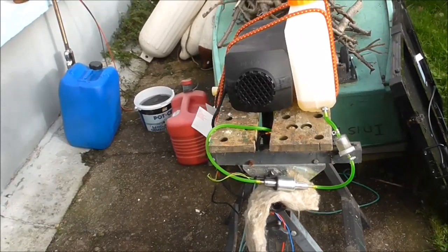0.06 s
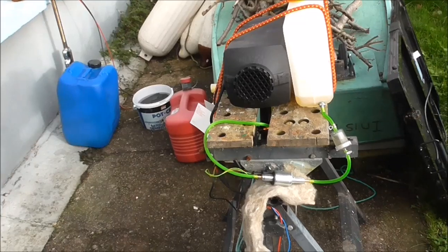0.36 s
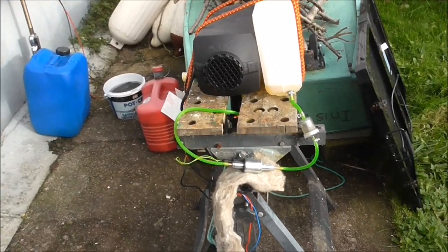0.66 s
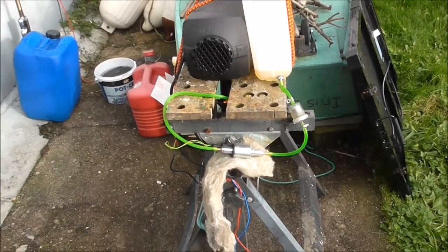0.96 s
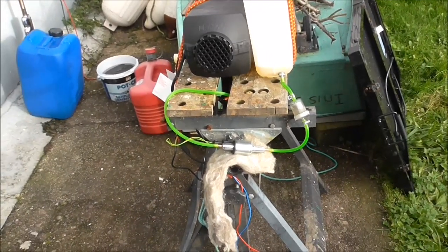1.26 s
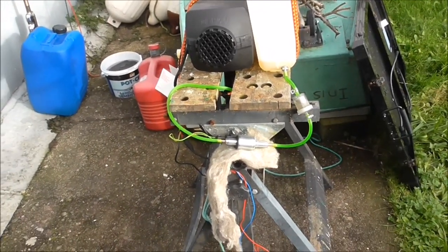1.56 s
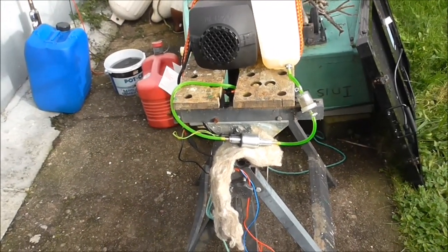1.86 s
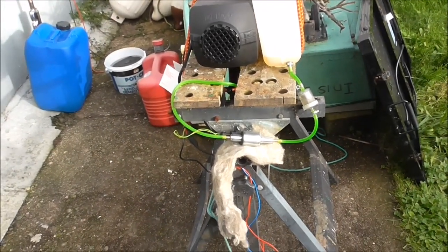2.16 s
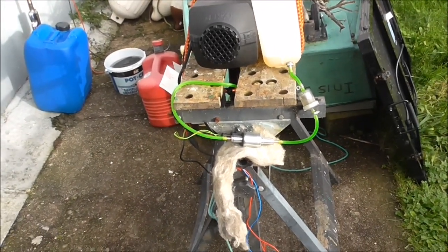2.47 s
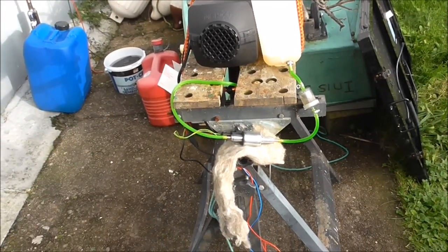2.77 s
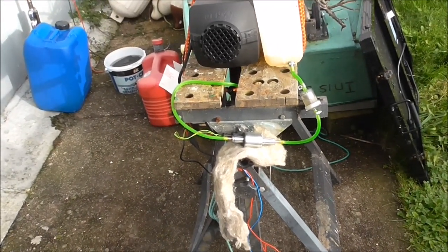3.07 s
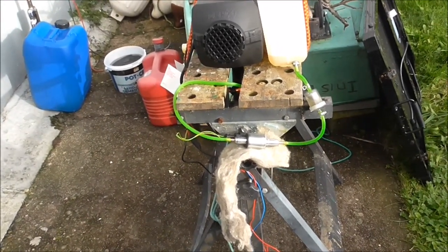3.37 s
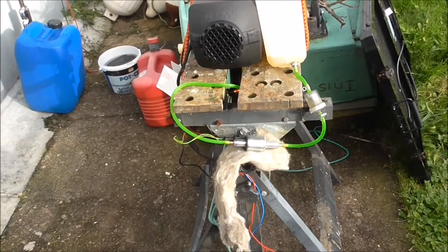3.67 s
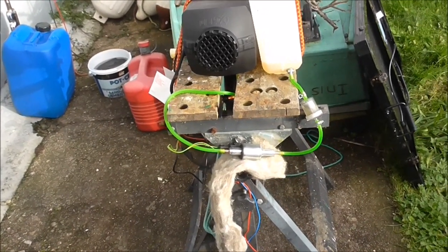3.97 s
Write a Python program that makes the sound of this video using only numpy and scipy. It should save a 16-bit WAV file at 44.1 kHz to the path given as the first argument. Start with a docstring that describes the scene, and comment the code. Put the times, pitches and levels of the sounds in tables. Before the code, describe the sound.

A diesel air heater runs close by outdoors for all four seconds, its low, slightly fluttering burner drone mixed with rushing fan air, a whirr and a thin whine. The fuel pump gives faint, sharp metallic ticks four times a second. Wind puffs rumble on the microphone from about 1.7 to 2.2 seconds. The whirr briefly rings louder around 1 second and several times from 3 seconds on.

```python
"""A diesel air heater runs steadily on a concrete yard, heard from a hand-held microphone a step away.
Its flame drones in the burner and exhaust pipe, and the low drone has brief louder swells.
The fan's swirling air makes the casing whirr over a steady rush, and the fuel pump's plunger
ticks four times a second. A few puffs of wind buffet the microphone."""
import sys
import numpy as np
from scipy import signal
from scipy.fft import rfft, irfft
from scipy.io import wavfile

SR = 44100
rng = np.random.default_rng(int(sys.argv[2]) if len(sys.argv) > 2 else 0)


def digitize_waveform(pressure):
    """Quantize a signal to 16-bit integers and store it at the path in sys.argv[1].

    Rows of a 2-D input are taken as channels; values are limited to [-1, 1].
    """
    field = np.atleast_2d(pressure).T
    bounded = np.clip(field, -1, 1)
    quanta = np.round(bounded * 32767).astype(np.int16)
    wavfile.write(sys.argv[1], SR, quanta)


N = 176400
TIME = np.arange(N) / SR
FREQS_HZ = np.maximum(np.arange(N // 2 + 1) * SR / N, 1)


def burner():
    """The flame makes the exhaust pipe and the burner ring with a low drone."""
    # the drone slowly rises and sags a little: t/s, level/dB
    slow_changes = [(0, -0.5), (.6, -.7), (1.07, 0), (1.3, -1.5), (1.5, 1), (1.72, -2), (1.9, 1),
                    (2.2, 0.9), (2.4, -1.5), (2.7, 0.5), (2.97, -1.4), (3.28, -1), (3.6, -0.5), (4, .5)]
    # the exhaust pipe's main resonances (pitches it likes to ring at): f/Hz, width/Hz, level/dB
    pipe_resonances = [(251.4, 43.4, -24), (297, 39.5, -29)]
    # the burner's weaker resonances: f/Hz, width/Hz, level/dB
    burner_resonances = [(66.4, 24, -53.5), (140.8, 22.5, -35), (164, 28, -41), (351, 26, -43),
                         (393, 23, -39.5), (471, 16, -50.5)]
    # brief louder swells of the low drone: t/s, length/s, f/Hz, peak/dB
    brief_swells = [(0.174, .014, 272, -12), (.351, 0.017, 260, -16), (0.482, 0.016, 292, -16),
                    (.931, 0.019, 289, -16.5), (1.014, .025, 238, -15.5), (1.072, 0.015, 254, -13),
                    (1.106, 0.036, 246, -16), (1.19, 0.015, 258, -13), (1.405, 0.014, 283, -10),
                    (1.554, 0.01, 277, -12), (1.639, 0.016, 251, -13.5), (1.9, 0.019, 270, -12),
                    (2.046, 0.02, 284, -14.5), (2.187, 0.03, 263, -13.5), (2.335, 0.011, 258, -13.5),
                    (2.685, 0.039, 242, -14), (3.138, .018, 265, -15.5), (3.19, 0.017, 255, -13.5),
                    (3.246, 0.013, 287, -14), (3.292, 0.014, 262, -13), (3.353, 0.0088, 280, -12.5),
                    (3.38, 0.0096, 268, -12), (3.549, 0.018, 247, -13.6), (3.786, .015, 288, -11),
                    (3.975, 0.012, 257, -9.5)]
    strength = from_db(in_time(slow_changes)[0])
    drone = soft_limit(strength * resonating(pipe_resonances, steepness=2.15), ceiling_db=-14)
    pipe = surging(drone, brief_swells, wobble_rad=0.078)
    return pipe + strength * resonating(burner_resonances, steepness=3.3)


def fan():
    """The fan's wavering air rushes and rings in the casing, with a whirr, whine and whistle on top."""
    # broad rush of air: f/Hz, level/dB per Hz
    rush_colour = [(20, -84), (45, -82), (85, -77), (130, -56.5), (200, -67.5), (330, -59.5), (440, -69),
                   (520, -64), (720, -62.5), (850, -65.5), (1150, -67), (1420, -64.5), (1550, -69.5),
                   (1950, -74.5), (2400, -83), (2600, -82.5), (2900, -87), (3150, -82.5), (3600, -78.5),
                   (3850, -86), (4100, -81), (5000, -82.5), (6550, -82.5), (6950, -88.5), (7700, -90.5),
                   (8900, -87.5), (11400, -93), (11900, -95.5), (12700, -96.5), (13500, -99), (15000, -101)]
    # resonances of the casing and outlet: f/Hz, width/Hz, level/dB
    casing_resonances = [(555, 100, -42), (612, 75, -38.5), (922, 16, -48), (1018, 58, -41.5),
                         (1183, 21, -47), (1688, 33, -51), (1800, 20, -53.5), (2133, 91, -45.5),
                         (2436, 47, -50.5), (3260, 64, -54), (3401, 49, -52), (5400, 90, -77),
                         (10864, 65, -67)]
    # the fan's main whirr: f/Hz, width/Hz, level/dB
    whirr_resonances = [(1283, 21, -39), (1334, 35, -35), (1377, 33, -35.5)]
    # the whine and a hollow ring above it: f/Hz, width/Hz, level/dB
    whine_resonances = [(2308, 24.5, -44), (3390, 52, -53.5)]
    # thin whistle of air at the intake: f/Hz, width/Hz, level/dB
    whistle_resonances = [(6510, 110, -61.5), (6760, 110, -68)]
    # level changes as the microphone moves: t/s, whirr/dB, whine/dB, whistle/dB
    level_changes = [(0, 0.5, 1.5, 10.5), (.35, -1.5, 2.5, 2), (.75, -0.5, 3.5, 1), (1.35, -3, -0.5, -8),
                     (1.68, -0.5, 1.5, -11), (1.82, 0.5, -4, 4), (2.1, 0, -3, 6), (2.5, .5, -1.5, 4.5),
                     (3.05, 0.8, -2, -5), (3.6, 1.8, -3.5, -5), (4, 1, -2, 1)]
    # moments when the whirr sings out: t/s, length/s, f/Hz, peak/dB
    surges = [(0.787, 0.034, 1355, -26.5), (0.895, 0.05, 1355, -24), (1.151, 0.034, 1349, -26),
              (2.444, 0.033, 1302, -24), (2.976, .02, 1340, -21), (3.246, .03, 1340, -22),
              (3.462, 0.026, 1335, -19.5), (3.72, 0.025, 1328, -18), (3.863, 0.028, 1323, -21)]
    rush_flutter_db, whirr_flutter_db = 0.5, 0.9
    pulse_hz, pulse_depth_db = 7.8125, 1.14
    whirr_db, whine_db, whistle_db = in_time(level_changes)
    airflow = waver(hz=12)
    rush = from_db(rush_flutter_db * airflow) * heater_noise(from_db(at_hz(rush_colour)) ** 2)
    casing = resonating(casing_resonances, steepness=1.86)
    pulse_db = pulse_depth_db * np.cos(2 * np.pi * pulse_hz * TIME)
    whirr_gain = from_db(whirr_db + pulse_db + whirr_flutter_db * airflow)
    whirr = surging(whirr_gain * resonating(whirr_resonances, steepness=1.78), surges, wobble_rad=0.49)
    whine = from_db(whine_db) * resonating(whine_resonances, steepness=1.01)
    whistle = from_db(whistle_db) * resonating(whistle_resonances, steepness=1.2)
    return rush + casing + whirr + whine + whistle


def pump():
    """At each stroke the plunger hits its stop, the small metal body rings and its bracket buzzes."""
    # strokes of the fuel pump: t/s, level/dB
    strokes = [(.0450, -28), (0.289, -27), (0.5336, -30), (.7782, -32), (1.0223, -28), (1.2671, -29),
               (1.5118, -29), (1.7558, -32), (2.0002, -30), (2.2447, -32), (2.4891, -30), (2.733, -29.5),
               (2.9784, -30), (3.2223, -33), (3.4667, -31), (3.7111, -29.5), (3.955, -27.5)]
    # the plunger's hits within one stroke: delay/s, level/dB
    hits = [(-.0004, -2.5), (.0001, 0), (.0007, -16)]
    # ringing tones of the pump's body: f/Hz, level/dB, fade time/s
    body_tones = [(5320, -5.5, .006), (5970, -10.5, .006), (7730, -10, 0.0047), (8600, -11.5, 0.0032),
                  (8960, -12, .005), (12500, -12, .002), (14300, -16, .002)]
    # buzz of the bracket: f/Hz, level/dB per Hz
    bracket_colour = [(3000, -105), (4800, -89), (5500, -82.5), (6800, -86), (7700, -83), (9200, -84),
                      (10500, -102), (15000, -110)]
    starts, stroke_db = np.transpose(strokes)
    # no two strokes sound quite alike
    hit_spread_db, tone_spread_db = 1, 2
    hit_chances = hit_spread_db * rng.standard_normal((len(starts), len(hits)))
    tone_chances = tone_spread_db * rng.standard_normal((len(starts), len(body_tones)))
    body = 0
    for (hz, tone_db, fade_s), tone_chance_db in zip(body_tones, tone_chances.T):
        clicks = np.zeros(N)
        for (delay, hit_db), hit_chance_db in zip(hits, hit_chances.T):
            samples = np.clip((starts + delay) * SR, 0, N - 1).astype(int)
            clicks[samples] += from_db(stroke_db + hit_db + hit_chance_db + tone_chance_db)
        body = body + from_db(tone_db) * ring(clicks, hz, fade_s)
    buzz_gain = np.zeros(N)
    for start, db in strokes:
        faded_db = 60 * np.clip((TIME - start) / .05, 0, 2)  # 60 dB quieter after 0.05 s
        buzz_gain += (TIME >= start) * from_db(db - stroke_db.mean() - faded_db)
    return body + buzz_gain * heater_noise(from_db(at_hz(bracket_colour)) ** 2)


def wind():
    """Breeze and puffs rumble on the microphone, pushing left and right mostly against each other."""
    # light breeze between the puffs: t/s, level/dB
    breeze = [(0, -52), (.5, -60), (1.3, -62), (1.65, -44), (2.3, -42), (2.75, -59), (3.0, -46), (3.3, -52),
              (4, -57)]
    # puffs of wind: t/s, length/s, level/dB, rustle compared with the puff/dB
    puffs = [(.17, 0.046, -36, -20), (1.727, 0.15, -33, -20), (1.88, 0.044, -23, -18), (2.1, .06, -23, -18),
             (2.182, 0.054, -21, -14), (3.045, 0.053, -44, -20), (3.435, 0.057, -33, -20)]
    # the wind's deep rumble: f/Hz, relative level/dB
    rumble_colour = [(20, -28), (50, 1.5), (90, 0.5), (135, 5.5), (200, -15), (300, -24), (600, -42),
                     (1500, -60), (5000, -90)]
    # the brighter rustle in a puff: f/Hz, relative level/dB
    rustle_colour = [(40, -14), (150, -4), (300, 4), (450, -11), (800, -26), (1500, -34), (5000, -60)]
    puff_edge_s = 0.024
    rumble_gain, rustle_gain = from_db(in_time(breeze)[0]), np.zeros(N)
    for start, length, db, rustle_db in puffs:
        inside_s = np.minimum(TIME - start, start + length - TIME)
        puff = from_db(db) * np.clip(.5 + inside_s / puff_edge_s, 0, 1)
        rumble_gain += puff
        rustle_gain += from_db(rustle_db) * puff
    rumble = air_noise(from_db(at_hz(rumble_colour)) ** 2, likeness=-0.87)
    rustle = air_noise(from_db(at_hz(rustle_colour)) ** 2, likeness=-0.87)
    return rumble_gain * rumble / rumble.std() + rustle_gain * rustle / rustle.std()


def colour_ripple(sound, delay_s=.0095, copy_db=-20):
    """Add a faint delayed copy, which slightly ripples the treble's colour."""
    delayed = np.array([np.interp(TIME - delay_s, TIME, channel, left=0) for channel in sound])
    return sound + from_db(copy_db) * delayed


def resonating(resonances, steepness):
    """Swirling air rings at a set of pitches; more steepness leaves less sound far from each pitch."""
    power = 0
    for hz, width, db in resonances:
        off_pitch = (FREQS_HZ / hz - hz / FREQS_HZ) * hz / width
        peak = (1 + off_pitch ** 2 / steepness) ** -steepness
        power = power + from_db(db) ** 2 * peak / (peak.sum() * SR / N)
    return heater_noise(power)


def surging(sound, surges, wobble_rad):
    """At each surge the noisy sound briefly gives way to one swelling, slightly unsteady note."""
    wobble = wobble_rad * waver(hz=45)
    for (middle, length, hz, db), phase in zip(surges, rng.random(len(surges))):
        swell = .5 ** np.minimum((2 * (TIME - middle) / length) ** 2, 20)
        note = np.sin(2 * np.pi * (hz * (TIME - middle) + phase) + wobble)
        sound = sound * np.sqrt(1 - swell) + from_db(db) * swell * note
    return sound


def soft_limit(sound, ceiling_db):
    """The strongest swings level off smoothly at a ceiling."""
    swing = np.abs(signal.hilbert(sound.mean(axis=0))) / from_db(ceiling_db)
    return sound / (1 + swing ** 6) ** (1 / 6)


def ring(clicks, hz, fade_s):
    """Each click starts a pure tone of its own height, which falls by 60 dB in fade_s."""
    decay, step = from_db(-60 / (fade_s * SR)), 2 * np.pi * hz / SR
    return signal.lfilter([1, 0, -1], [2, -4 * decay * np.cos(step), 2 * decay * decay], clicks + 1e-18)


def heater_noise(power):
    """Air noise spread between left and right the way the heater is heard."""
    # the heater's stereo image: f/Hz, left-right likeness/0-1, left minus right/dB, left's lead/rad
    image = [(70, 0.86, 0, 0.09), (142, 1, -1.5, -0.02), (249, 0.99, -1.5, 0.052),
             (346, 0.99, -0.2, -0.095), (450, 0.94, -0.3, 0.16), (620, 0.98, 0.3, 0.16),
             (800, 0.89, 1.5, 0.097), (1040, 0.964, 0.5, -0.045), (1170, 0.62, 1, 0.01),
             (1250, 0.96, 7, 0.56), (1360, 0.97, -1.5, 0.19), (1450, 0.92, 2.5, 0.13),
             (1750, 0.93, -1, -0.014), (1950, 0.97, 6, -0.013), (2140, 0.91, 0, -0.01),
             (2300, 0.96, 2.5, 0.17), (2680, 0.7, 2, -0.06), (3400, 0.88, -0.3, -0.3),
             (4000, 0.71, -1, -0.1), (6300, 0.826, -0.1, 0.12), (8000, 0.76, -0.5, 0.02),
             (9500, 0.47, -2, 0.13), (10900, 0.525, 0.5, 0.33), (12500, 0.86, 0.1, 0.03)]
    half_each = np.array([[.5], [-.5]])
    balance = from_db(half_each * at_hz(image, column=2))
    lead = np.exp(1j * half_each * at_hz(image, column=3))
    return air_noise(power, at_hz(image), lean=balance * lead)


def air_noise(power, likeness, lean=1):
    """Stereo noise of a given power per Hz; likeness 1 is alike, -1 opposite; lean weights each side."""
    shared, opposed = rfft(rng.standard_normal((2, N)))
    alike = np.clip(likeness, -.9995, .9995)
    pair = np.sqrt(1 + alike) * shared + np.sqrt(1 - alike) * opposed * [[1], [-1]]
    return irfft(lean * pair * np.sqrt(power * SR) / 2, N)


def waver(hz):
    """Slow random wavering up to about the given rate, with a typical size of 1."""
    slow = irfft(rfft(rng.standard_normal(N)) / (1 + (FREQS_HZ / hz) ** 2), N)
    return (slow - slow.mean()) / slow.std()


def from_db(db):
    """Turn decibels into a factor to multiply by."""
    return 10 ** (np.asarray(db) / 20)


def in_time(rows):
    """Join a table's points over time, giving one curve for each column after the first."""
    times, *columns = np.transpose(rows)
    return [np.interp(TIME, times, values) for values in columns]


def at_hz(rows, column=1):
    """Join one column's points over pitch, giving a value for every frequency."""
    columns = np.transpose(rows)
    return np.interp(np.log(FREQS_HZ), np.log(columns[0]), columns[column])


def scene():
    """The heater with its pump, and the wind."""
    return colour_ripple(burner() + fan() + pump()) + wind()


def record(dry):
    """The highest treble is cut off steeply."""
    cutoff_hz = 15400
    return signal.sosfilt(signal.ellip(10, .1, 80, cutoff_hz, fs=SR, output="sos"), dry)


dry = scene()
out = record(dry)
digitize_waveform(out)
```